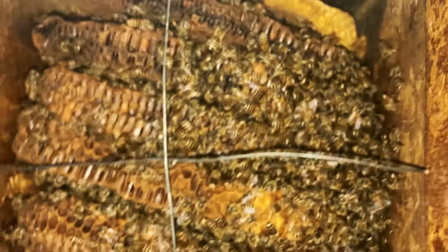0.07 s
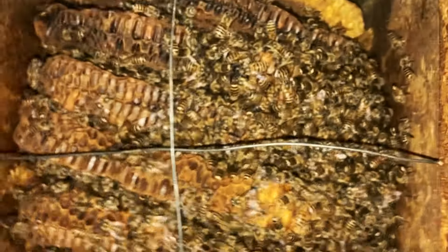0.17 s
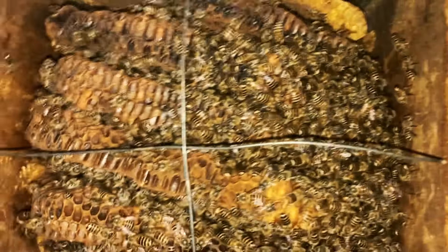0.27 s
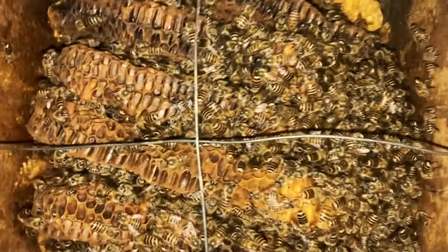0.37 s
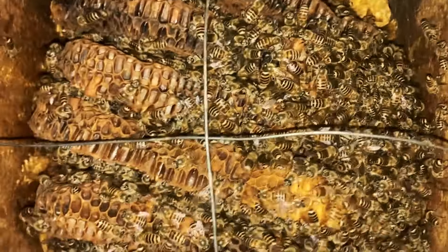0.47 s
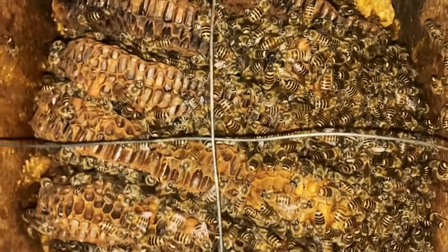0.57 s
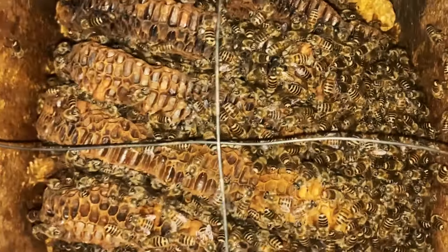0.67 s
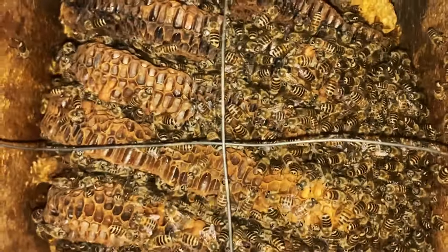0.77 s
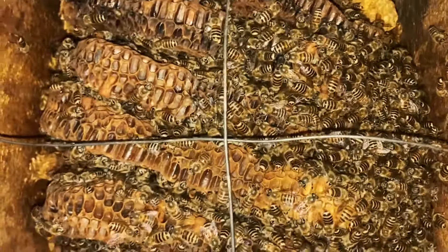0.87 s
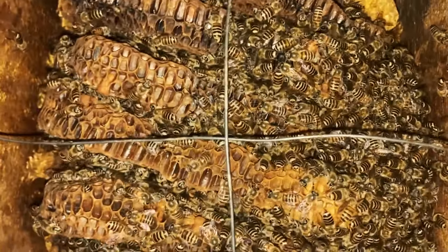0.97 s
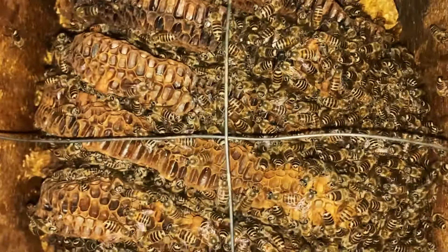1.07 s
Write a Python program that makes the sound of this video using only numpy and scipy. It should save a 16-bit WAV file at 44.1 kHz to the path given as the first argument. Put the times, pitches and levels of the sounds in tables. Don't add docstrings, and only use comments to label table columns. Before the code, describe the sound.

Massed bees drone up close on their combs, legs scratching and wings brushing, as the hum gradually swells and single bees whine past.

```python
import sys
import numpy as np
from scipy import signal
from scipy.fft import rfft, irfft, next_fast_len
from scipy.io import wavfile

SR = 44100
rng = np.random.default_rng(int(sys.argv[2]) if len(sys.argv) > 2 else 0)


def boost(x):
    u = np.asarray(x, float) / 20
    return 10 ** u


def pcm_store(signal):
    levels = np.round(np.clip(np.atleast_2d(signal), -1, 1) * 32767)
    wavfile.write(sys.argv[1], SR, levels.astype(np.int16).T)


N = 251811
T = np.arange(N) / SR
HZ = np.maximum(np.fft.rfftfreq(next_fast_len(N), 1 / SR), 1)


def spectrum_of(x):
    return rfft(x, next_fast_len(N))


def wave_of(spectrum):
    return irfft(spectrum, next_fast_len(N))[..., :N]


def rms_one(x):
    return x / np.sqrt(np.mean(x ** 2) + 1e-20)


def in_time(rows):
    s, *columns = np.transpose(rows)
    return [np.interp(T, s, column) for column in columns]


def in_pitch(rows):
    hz, *columns = np.transpose(rows)
    return [np.interp(np.log(HZ), np.log(hz), column) for column in columns]


def drift(rate, span=slice(None)):
    knots = rng.standard_normal(400)
    return np.interp(T[span] * rate, np.arange(400), knots)


def follows(mean_db, share):
    # [start_s, level_db]
    effort = [
        (0.0, -52),
        (1.4, -52),
        (1.6, -50),
        (2.05, -50.5),
        (4.23, -49),
        (4.6, -47.5),
        (5.23, -46),
        (5.71, -46.5),
    ]
    effort_db, = in_time(effort)
    return mean_db + share * (effort_db - effort_db.mean())


def hiss():
    # [pitch_hz, left_db per hz, right_re_left_db]
    hiss_colour = [(600, -57, -3), (1500, -7.5, -12), (2500, 1, -4.5), (3060, -2, -2.5), (3700, 1.1, -6),
                   (5080, -2, 0), (5430, -10, 1), (6800, -2.5, 3), (7530, -3, 0), (9000, -20, -4),
                   (15600, -14, 4)]
    left_db, lean_db = in_pitch(hiss_colour)
    colour = boost(np.array([left_db, left_db + lean_db]))
    noise = wave_of(spectrum_of(rng.standard_normal((2, N))) * colour)
    return rms_one(noise) * boost(follows(-55, 0.74) + 1.2 * drift(12.0))


def trill(start, length, hz, db, rise, right_db):
    out = np.zeros((2, N))
    span = slice(max(int(start * SR), 0), min(int((start + length) * SR), N))
    part = (T[span] - start) / length
    swell = np.sqrt(abs(np.sin(np.pi * part))) * boost(db + 2.5 * drift(11.0, span))
    turn = 2 * np.pi * np.cumsum(hz + rise * length * (part - .5)) / SR
    width_hz = 105
    pole = np.exp(-2 * np.pi * width_hz / SR)
    a, b = signal.lfilter([1], [1, -2 * pole, pole ** 2], rng.standard_normal((2, len(part))))
    rasp = rms_one(a * np.cos(turn) + b * np.sin(turn))
    out[:, span] = swell * rasp * boost(np.array([[0], [right_db]]))
    return out


def way_in():
    wave_pitches = [5114, 5216, 5290, 5523, 5577, 5700, 5798, 6010, 6090, 6148, 6205, 6261, 6325, 6395,
                    6460, 6546, 6615, 6729, 6788, 6900, 6988, 7110, 7219, 7290, 7354, 7402, 7500, 7630,
                    7687, 7865]
    width_hz = 9
    way = np.full((2, len(HZ)), .55 + 0j)
    near = (HZ > 4500) & (HZ < 8800)
    for hz in wave_pitches:
        strength = boost(-.5 + 1.5 * rng.standard_normal((2, 1)))
        strength = strength * np.exp(.9j * rng.standard_normal((2, 1)))
        way[:, near] += strength / (1 + 1j * (HZ[near] - hz) / width_hz)
    return way


def trills():
    # [start_s, length_s, middle_pitch_hz, level_db]
    climbing = [(-.4, 1.35, 7250, -63.5), (-.4, 1.35, 7520, -63), (-.4, 1.0, 7850, -65),
                (.04, 1.36, 6350, -72), (.7, .9, 7300, -63), (.94, .51, 8050, -67), (1.6, 1.2, 6760, -65.5),
                (1.4, 1.05, 7240, -63.5), (3.11, 1.0, 6625, -67), (3.31, 2.2, 6385, -65),
                (3.81, 1.4, 5235, -72), (4.21, 2.0, 6110, -67.5), (4.91, 1.3, 5720, -72)]
    # [start_s, length_s, middle_pitch_hz, level_db]
    holding = [
        (-.4, 1.4, 6775, -71),
        (1.11, 1.85, 6010, -71.5),
        (2.2, 3.0, 5375, -71.5),
        (2.3, 2.6, 5690, -71),
        (2.3, 1.3, 5225, -73),
        (2.41, 1.4, 7360, -70),
        (2.44, .77, 6400, -68),
        (2.51, 2.6, 5540, -70),
        (2.61, 1.3, 6995, -67),
        (3.0, 2.0, 5800, -73),
    ]
    # [pitch_hz, right_re_left_db]
    trill_lean = [(6500, 3), (7200, 1)]
    out = np.zeros((2, N))
    for rows, rise_hz_per_s in ((climbing, 220), (holding, 40)):
        for start, length, hz, db in rows:
            right_db = np.interp(hz, *np.transpose(trill_lean))
            out += trill(start, length, hz, db, rise_hz_per_s, right_db)
    return boost(2.0) * wave_of(spectrum_of(out) * way_in())


def rustle():
    # [start_s, level_db]
    bustle = [(0.0, -60.5), (0.49, -59.5), (0.83, -60.5), (2.15, -59), (2.93, -56), (3.39, -58.5),
              (3.59, -57), (3.99, -57.5), (4.42, -56), (4.68, -54), (4.98, -56), (5.71, -54)]
    # [pitch_hz, level_db]
    scratch_colour = [(2500, -25), (5000, -11), (7000, -3), (9000, 3), (12000, 1.2), (14000, 2),
                      (15000, 0.5), (16000, 1.5)]
    uneven = boost(4.4 * np.minimum(rng.exponential(1, N), 4))
    grains = spectrum_of(uneven * rng.standard_normal(N)) * boost(in_pitch(scratch_colour)[0])
    together_db = 0.26 * drift(25.3)
    out = 0
    for hz in np.arange(2000, 17000, 2000):
        band = wave_of(grains * np.maximum(1 - abs(HZ - hz) / 2000, 0))
        out = out + band * boost(together_db + 1.54 * drift(16.0))
    return rms_one(out) * boost(in_time(bustle)[0] + 5.5)


def brushes():
    # [middle_s, length_s, centre_pitch_hz, width_hz, level_db]
    strokes = [(0.432, .06, 11000, 5000, -60), (0.54, .05, 11000, 5000, -60),
               (1.134, .025, 6800, 3000, -56), (1.6, .05, 14500, 2000, -64), (2.403, .12, 11500, 4000, -58),
               (2.555, 0.032, 10000, 3000, -53), (2.62, .06, 10100, 2500, -49.5),
               (2.643, .04, 12000, 8000, -55), (2.775, 0.036, 11000, 2500, -54),
               (2.97, .03, 14000, 3000, -54), (3.005, 0.04, 13800, 3000, -48), (2.99, .02, 8000, 600, -54),
               (3.055, .03, 12700, 800, -53), (3.55, 0.16, 11500, 4000, -56.5),
               (4.425, 0.037, 11500, 3000, -50), (4.49, .06, 12100, 1500, -49.5),
               (4.508, 0.1, 6970, 2500, -55), (4.6, .04, 11500, 4000, -52),
               (4.705, 0.061, 12000, 2500, -52), (4.78, .12, 14900, 1500, -53),
               (5.247, 0.07, 10200, 2000, -51), (5.3, 0.22, 9000, 900, -59)]
    beats_per_s = 168
    out, white = np.zeros(N), rng.standard_normal(N)
    for s, length, hz, width, db in strokes:
        span = slice(max(int((s - .3) * SR), 0), int((s + .3) * SR))
        edges = [hz - width / 2, min(hz + width / 2, .45 * SR)]
        band_filter = signal.butter(2, edges, "band", fs=SR, output="sos")
        band = rms_one(signal.sosfilt(band_filter, white[span]))
        rate = beats_per_s * rng.uniform(.88, 1.12)
        chop = 1 + 0.84 * np.cos(2 * np.pi * rate * T[span])
        swell = np.exp(-(2 * (T[span] - s) / length) ** 4)
        out[span] += boost(db) * band * chop * swell
    return out


def from_the_side(x):
    lag_s, turn_rad = 2.24e-4, -9.76
    shift = np.exp(1j * (2 * np.pi * HZ * lag_s + turn_rad))
    return np.array([x, wave_of(spectrum_of(x) * shift)])


def flyer(path):
    # [multiple of the wing beat, level_db]
    overtones = [(1, 9), (2, 3.5), (3, -12), (4, -1), (5, -13)]
    out = np.zeros(N)
    span = slice(int(path[0][0] * SR), int(path[-1][0] * SR))
    rate, db = (column[span] for column in in_time(path))
    turn = 2 * np.pi * np.cumsum(rate * (1 + .005 * drift(30.0, span))) / SR
    for k, level_db in overtones:
        out[span] += boost(db + 4 + level_db + 2.5 * drift(20.0, span)) * np.sin(k * turn)
    return out * boost(np.array([[2.0], [-2.0]]))


def flyers():
    # [start_s, wing_beats_per_s, level_db]
    flights = [
        [(1.44, 238, -72), (1.5, 240, -59), (1.63, 244, -57), (1.76, 229, -58), (1.9, 216, -59),
         (2.1, 213, -60), (2.3, 208, -61), (2.4, 202, -72)],
        [(4.4, 236, -72), (4.52, 240, -60), (4.7, 226, -60), (4.85, 230, -58), (5.2, 233, -59), (5.5, 227, -60),
         (5.71, 230, -61)],
        [(4.7, 196, -72), (4.85, 202, -62), (5.1, 204, -61), (5.3, 188, -62), (5.6, 184, -63), (5.71, 180, -65)],
    ]
    return sum(flyer(path) for path in flights)


def crowd(count, wander, noise_share):
    beats = np.zeros(N)
    for rate in np.geomspace(85, 260, count):
        cycles = np.cumsum(rate * (1 + wander * drift(6.0))) / SR + rng.random()
        pulses = np.diff(np.floor(cycles), prepend=0)
        beats += pulses * boost(3.46 * drift(2.96))
    return spectrum_of(rms_one(beats - beats.mean()) + noise_share * rng.standard_normal(N))


def colony():
    # [pitch_hz, width_hz, left_db, right_re_left_db, right_leads_rad]
    box = [(30, 14, -30, -0.5, -4), (48.3, 8.8, -11, -0.5, 0.8), (73.5, 19.4, -3, -1, -0.5),
           (97.6, 17.4, 0, 0, 0.38), (115.5, 12, -4.5, -4.5, -0.4), (136, 34.5, -4, -3.5, 0.14),
           (183, 26, -3.5, -3, 0.16), (197, 27, -6, -7.5, 0.86), (251.6, 55.5, -7.5, -6, 0.4),
           (353.3, 29.6, -6, -7, 0.53), (404.7, 28.5, -6, -7, 0.36), (535, 100, -28, -3.5, 1.5),
           (732, 25.5, -20, -9, 0.95), (865, 91, -21.5, -5, 1), (1073, 112, -23.5, -5.5, 1),
           (1205, 116, -29, -3, -1.07), (1480, 78, -31, -2.5, 2), (1694, 65, -26, -1.2, 0.5),
           (1852, 90, -34.5, 1, -0.5), (2130, 210, -36.5, -2.5, -2.5), (2320, 74, -36, -9, 1.5)]
    # [pitch_hz, left_db, right_re_left_db]
    own_path = [(25, -72, 0.2), (100, -25, 3), (302, -28, -3), (620, -26, -10), (1000, -32.5, -9.5),
                (1380, -39.5, -2), (2300, -40, -9), (4000, -74, -6)]
    zone_edges = (140, 480)
    left_db, lean_db = in_pitch(own_path)
    left, right, cross = boost(2 * left_db), boost(2 * (left_db + lean_db)), 0
    for hz, width, level_db, right_db, turn in box:
        power = boost(2 * level_db) / (1 + ((HZ - hz) / width) ** 2) ** 3
        left = left + power
        right = right + power * boost(2 * right_db)
        cross = cross + power * boost(right_db) * np.exp(1j * turn)
    alike = cross / np.sqrt(left * right)
    near = crowd(count=16, wander=.03, noise_share=1.27)
    far = crowd(count=8, wander=.03, noise_share=1.58)
    right_mix = alike * near + np.sqrt(1 - abs(alike) ** 2) * far
    pair = np.array([np.sqrt(left) * near, np.sqrt(right) * right_mix])
    low, high = (1 / (1 + (HZ / edge) ** 12) for edge in zone_edges)
    # mask, mean level in dB, share of the effort's swing
    zones = [(low, -36.5, 0.38), (high - low, -37.5, 0.58), (1 - high, -50, 0.91)]
    out = 0
    for mask, mean_db, share in zones:
        zone = wave_of(pair * mask)
        out = out + boost(follows(mean_db, share)) * zone / np.std(zone.mean(axis=0))
    return out


def scene():
    wax = from_the_side(rustle() + brushes())
    return hiss() + trills() + wax + flyers() + colony()


def roll_off(x):
    return signal.sosfilt(signal.butter(12, 17090, fs=SR, output="sos"), x)


def record(dry):
    port_low_hz, top_hz = 36, 15740
    passed = (HZ < top_hz) / np.sqrt(1 + (port_low_hz / HZ) ** 8)
    mix = wave_of(spectrum_of(dry) * passed)
    return roll_off(mix)


dry = scene()
out = record(dry)
pcm_store(out)
```